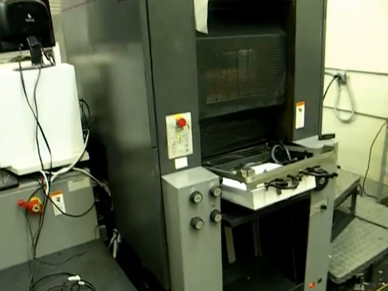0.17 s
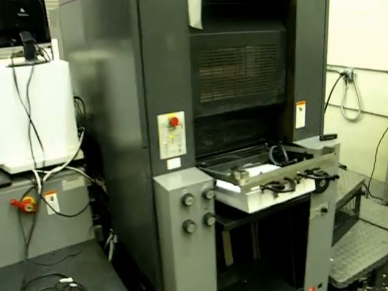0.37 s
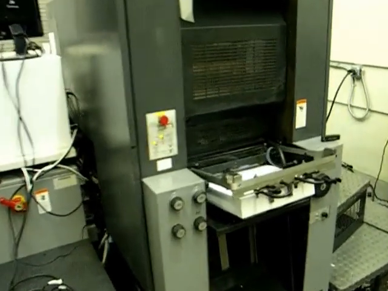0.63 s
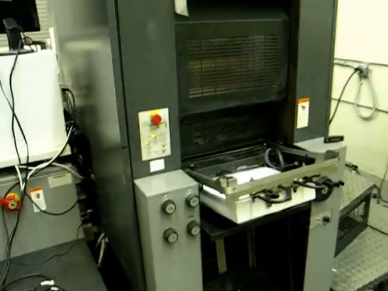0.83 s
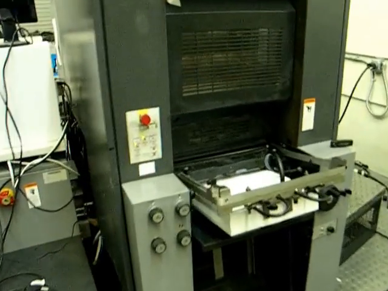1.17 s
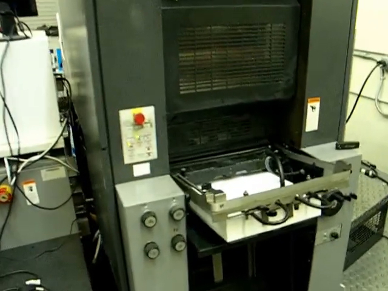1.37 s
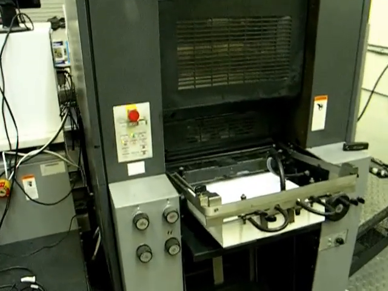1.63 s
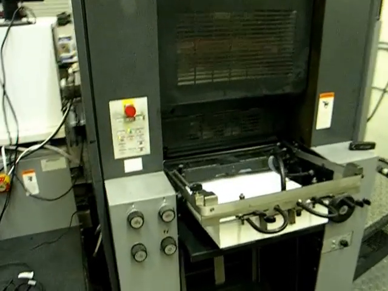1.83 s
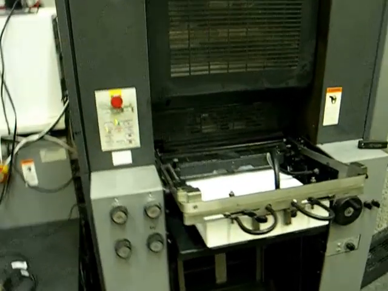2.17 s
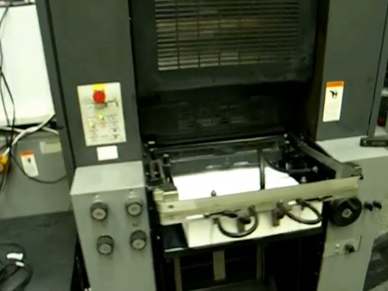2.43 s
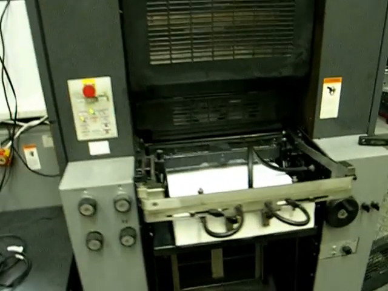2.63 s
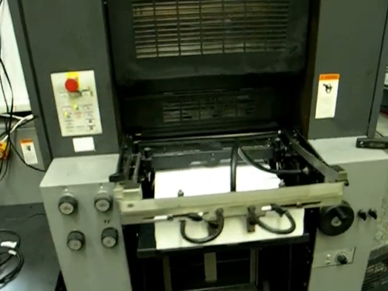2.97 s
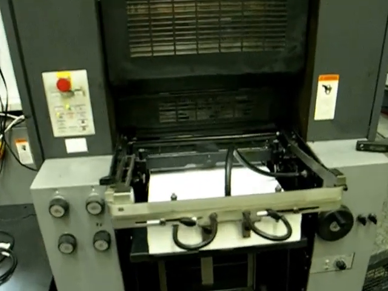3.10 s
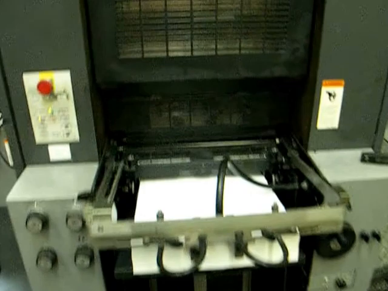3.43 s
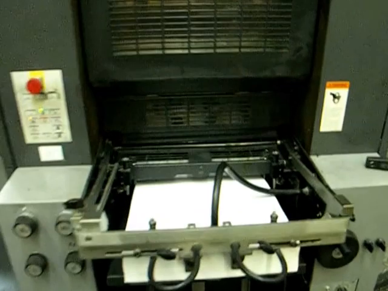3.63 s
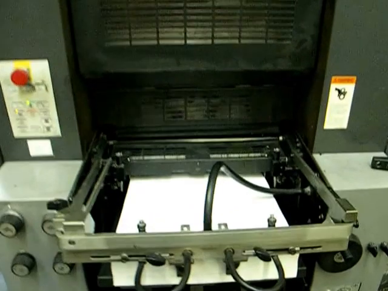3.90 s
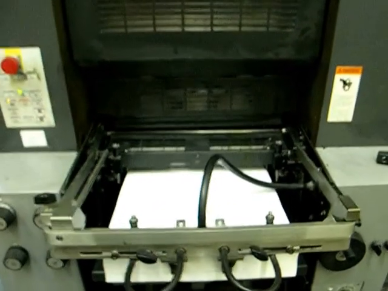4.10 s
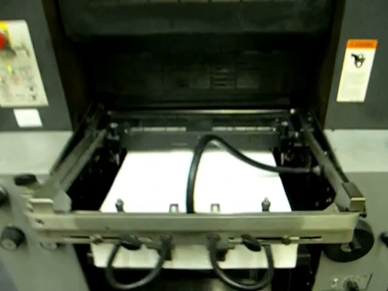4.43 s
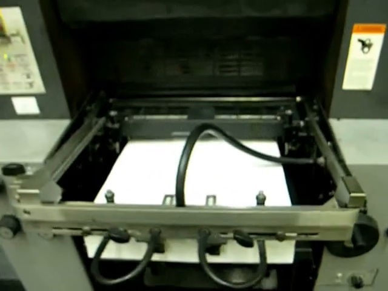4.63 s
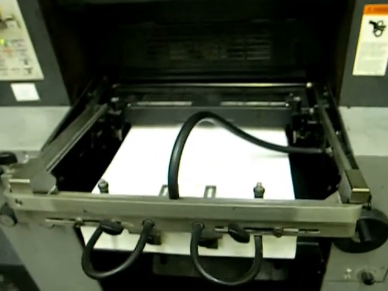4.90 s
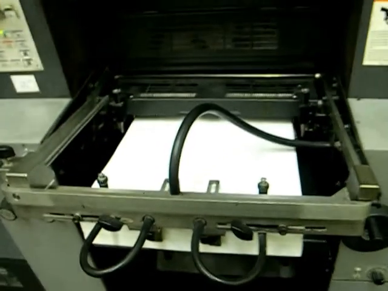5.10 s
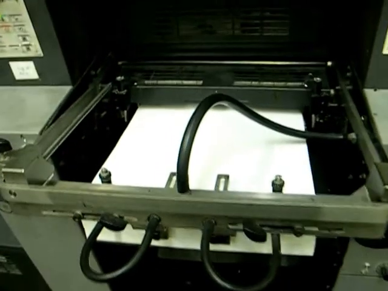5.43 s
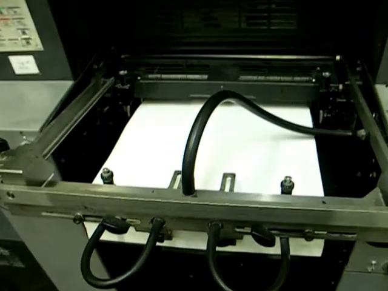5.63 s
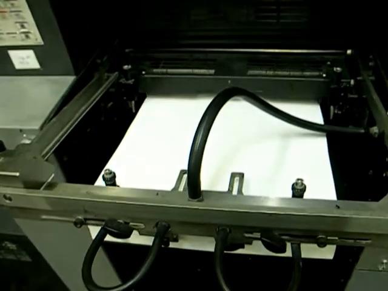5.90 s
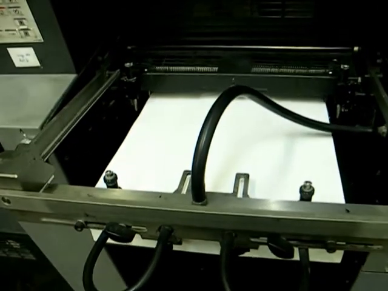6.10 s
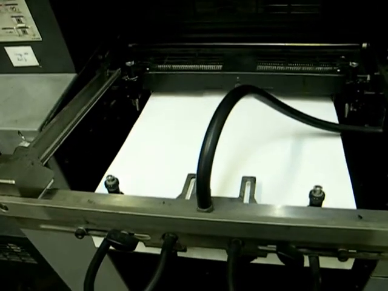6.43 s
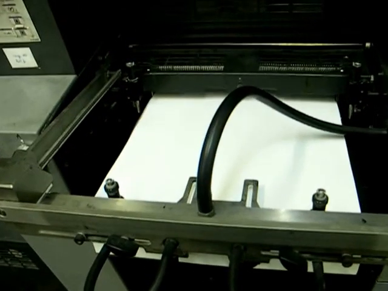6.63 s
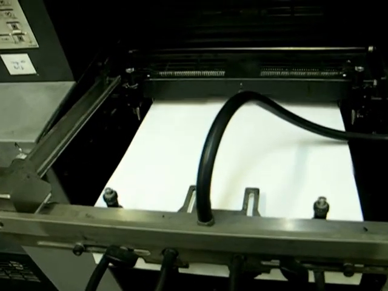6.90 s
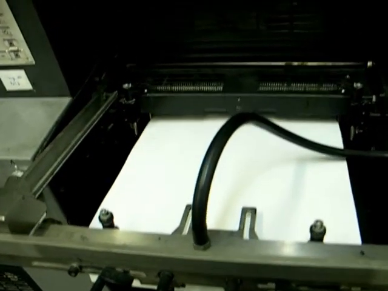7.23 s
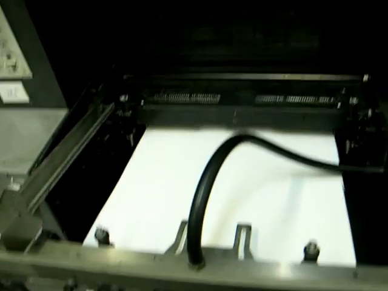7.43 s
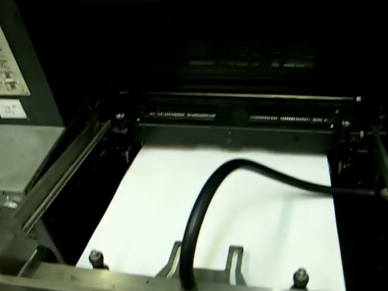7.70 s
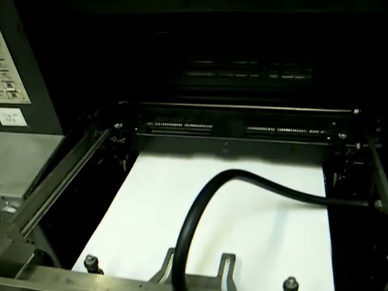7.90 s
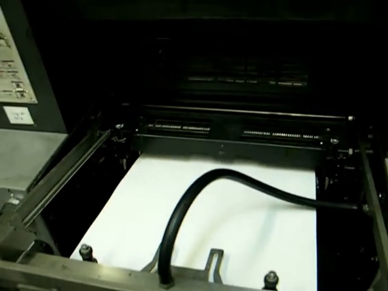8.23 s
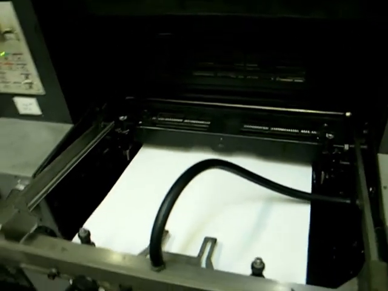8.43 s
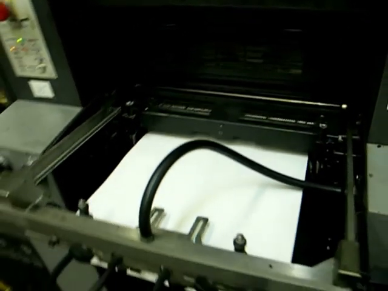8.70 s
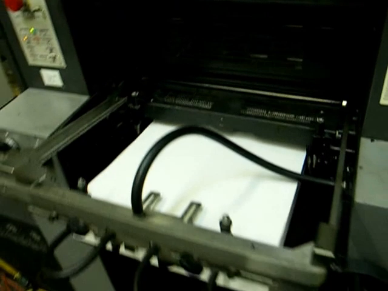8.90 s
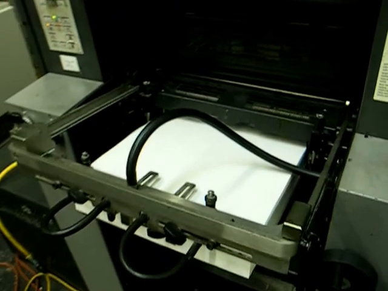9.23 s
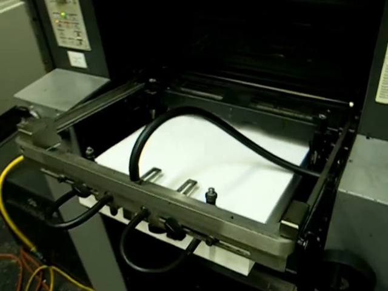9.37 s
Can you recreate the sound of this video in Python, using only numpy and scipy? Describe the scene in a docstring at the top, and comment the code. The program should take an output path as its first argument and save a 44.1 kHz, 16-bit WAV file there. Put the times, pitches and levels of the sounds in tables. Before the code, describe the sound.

Rhythmic clatter of a sheetfed printing press, two hollow clacks a second, with gear rumble, suction hiss and a droning pump and blower.

```python
"""A small sheetfed offset press runs at about two sheets a second, heard on a walk up to its feeder.
In every turn gears rumble, suction air and paper rush, cams knock, panels boom and the feeder shuts
with a hard clack; now and then a sheet slaps a guide. Motor, pump and blower hum underneath, with a few
dull bumps. The narrow-band microphone ducks its gain after each clack and clips the peaks."""
import sys
import numpy as np
from scipy import signal
from scipy.fft import rfft, irfft, next_fast_len
from scipy.io import wavfile
from scipy.ndimage import uniform_filter1d, map_coordinates

SR = 44100
rng = np.random.default_rng(int(sys.argv[2]) if len(sys.argv) > 2 else 0)


def dump(signal):
    """Clip the signal to [-1, 1] and save it as 16-bit WAV at the path in sys.argv[1]."""
    limited = np.clip(np.atleast_2d(signal).T, -1, 1)
    pcm = np.round(limited * 32767).astype(np.int16)
    wavfile.write(sys.argv[1], SR, pcm)


N = 421155
TIME = np.arange(N) / SR

# The colour of rattles and paper cracks. Each row: frequency in Hz, level in dB.
RATTLE_SPECTRUM = [(40, -24), (130, -18.5), (250, -12.5), (700, -3.5), (1500, 5.5), (2100, 6.5),
                   (3000, 2.5), (4000, -4.5)]


def feeder_clacks(level_db=7, ring_hz=796, scatter_db=1.0, detune=.03, lead_s=.0012):
    """The feeder bar hits its stop at the end of each turn: a loud, hollow, heavily damped ring."""
    out = np.zeros(N)
    t = np.arange(SR // 10) / SR
    envelope = fade(t, t60=0.02, attack_s=.0015)
    for end in turn_ends():
        force, pitch = rng.standard_normal(2)
        ring = np.sin(2 * np.pi * ring_hz * (1 + detune * pitch) * t)
        add(out, end - lead_s, amp(level_db + scatter_db * force) * envelope * ring)
    return out


def knocks(scatter_db=0.68, detune=.025, jitter_s=0.00056):
    """Cams, suckers and stops strike in every turn: a short ring and a rattle, never twice quite alike."""
    # Each row: time from the clack in seconds, ring pitch in Hz, ring level in dB, rattle level in dB.
    contacts = [(-.273, 596, -15.5, -27.5), (-.2055, 719, -18.5, -11.5), (-.177, 2456, -19.5, -14.5),
                (-.166, 678, -12, -24), (-.160, 1382, -19.5, -16), (-.1195, 1350, -14.5, -15),
                (-.0885, 1200, -10.5, -18), (-.0815, 2825, -13, -15.5), (-.0805, 1354, -16, -24.5),
                (-.0795, 551, -12.5, -30.5), (-.0016, 1650, -9, -11.5), (.0046, 1460, -4.5, -12.5),
                (.0055, 648, -8.5, -18.5), (.032, 2880, -24, -20.5), (.037, 566, -14.5, -23)]
    rings, rattle_power = np.zeros(N), np.zeros(N)
    t = np.arange(SR // 10) / SR
    rattle_fade = fade(t, t60=0.04)
    for s, hz, ring_db, rattle_db in contacts:
        ring_fade = amp(ring_db) * fade(t, t60=.03 * (1000 / hz) ** 0.57)  # higher rings die sooner
        for end in turn_ends():
            size, pitch, late = rng.standard_normal(3)
            start, force = end + s + jitter_s * late, amp(scatter_db * size)
            add(rings, start, force * ring_fade * np.sin(2 * np.pi * hz * (1 + detune * pitch) * t))
            add(rattle_power, start, (force * amp(rattle_db) * rattle_fade) ** 2)
    return rings + np.sqrt(rattle_power) * turning_noise(RATTLE_SPECTRUM, share=0.25)


def gears(idle_db=-28.5, load_boost_db=10.5, pull_boost_db=3.5):
    """The gears rumble louder as they take up the load, and surge as the sheet is pulled in."""
    # Each row: frequency in Hz, level in dB.
    rumble_spectrum = [(30, -41.5), (80, -42.5), (120, -16.5), (150, -12), (200, -3.5), (280, -2.5),
                       (430, 2), (520, -5.5), (640, -1), (1000, -4), (1600, -9), (4000, -20)]
    t = since_clack()
    load = stroke(t, start_s=.125, attack_s=0.097, release_s=0.072)
    pull = swell(t - 0.3775, width_s=0.032)
    level_db = idle_db + load_boost_db * load + pull_boost_db * pull
    return amp(level_db) * turning_noise(rumble_spectrum, share=0.37)


def suction_air(shut_db=-34.5, open_boost_db=16, lift_boost_db=7.5):
    """Air and crinkling paper rush while the suction is open, with a hiss as the suckers lift a sheet."""
    # Each row: frequency in Hz, level in dB.
    rush_spectrum = [(150, -47), (500, -3.5), (900, -9), (1300, -17.5), (1700, -6), (2400, 4.5),
                     (3000, 2.5), (4000, 0.5)]
    t = since_clack()
    suction = stroke(t, start_s=0.089, attack_s=.125, release_s=0.011)
    lift = swell(t - 0.247, width_s=0.012)
    level_db = shut_db + open_boost_db * suction + lift_boost_db * lift
    crinkle = amp(1.3 * wobble(400) + .4 * wobble(40))
    return amp(level_db) * unit(crinkle * turning_noise(rush_spectrum, share=0.65))


def panel_booms(scatter_db=0.5, detune=0.013):
    """The side panels resonate as the load passes, swelling and sinking at set points of the turn."""
    # Each row: time from the clack in seconds, pitch in Hz, swell width in seconds, level in dB.
    booms = [(-.305, 405.5, 0.026, -22.5), (-.24, 221.4, 0.016, -21), (-.218, 410.4, 0.025, -22.5),
             (-.158, 394, 0.0098, -28), (-.13, 203, .028, -22), (-.055, 400, 0.036, -23.5),
             (-.035, 198.6, 0.028, -21)]
    out = np.zeros(N)
    t = np.arange(-SR // 10, SR // 10) / SR
    for end in turn_ends():
        for s, hz, width_s, db in booms:
            force, pitch, phase = rng.standard_normal(3)
            envelope = amp(db + scatter_db * force) * swell(t, width_s)
            tone = np.sin(2 * np.pi * (hz * (1 + detune * pitch) * t + phase))
            add(out, end + s + t[0], envelope * tone)
    return out


def sheet_slaps(ring_db=-5, crack_db=-13):
    """Now and then a sheet's edge hits a guide harder: a short ring and a papery crack."""
    # Each row: start in seconds, level in dB, ring pitch in Hz.
    slaps = [(2.9482, -6.5, 641), (3.0464, 0, 528), (5.005, -2.5, 1350), (5.5656, -4, 1330),
             (6.6191, -3, 1280), (7.1344, -3.5, 582), (8.549, -5, 678)]
    rings, crack_envelope = np.zeros(N), np.zeros(N)
    t = np.arange(SR // 10) / SR
    for s, db, hz in slaps:
        blow = amp(db) * fade(t, t60=.025)
        add(rings, s, blow * np.sin(2 * np.pi * hz * t))
        add(crack_envelope, s, blow)
    return amp(ring_db) * rings + amp(crack_db) * crack_envelope * noise(RATTLE_SPECTRUM)


def motor_hum():
    """Mains and motor hum, with one high overtone from the blower."""
    # Each row: pitch in Hz, level in dB.
    tones = [(120, -55), (163, -50.5), (199.3, -37), (398.8, -34), (2664, -50)]
    return sum(shaken_tone(hz, db) for hz, db in tones)


def vacuum_pump(pitch_hz=233.3):
    """The pump drones, coming through more as the microphone leans over the sheets."""
    # The level of each harmonic in dB, from the fundamental up.
    harmonics_db = [-38.5, -36, -38.5]
    # Each row: time in seconds, gain in dB.
    gain_ride = [(0, -2), (5, -3.5), (5.8, 3.5), (9.55, 1)]
    drone = sum(shaken_tone(k * pitch_hz, db) for k, db in enumerate(harmonics_db, 1))
    return amp(along_walk(gain_ride)) * drone


def blower(rush_db, whine_hz=1333):
    """The blower rushes steadily while the whine of its blades comes and goes along the walk."""
    # Each row: time in seconds, level in dB.
    whine_ride = [(0, -36), (1.15, -30.5), (2.9, -44), (4.5, -31.5), (6.1, -35), (6.7, -40.5), (8.3, -43),
                  (9.1, -30)]
    # Each row: frequency in Hz, level in dB.
    rush_spectrum = [(30, -35.5), (85, -30), (120, -11), (145, -21.5), (180, -15), (270, -3.5), (370, -0.5),
                     (620, -1), (1000, -4), (1600, -5), (2100, -6), (3000, -9.5)]
    whine_db = along_walk(whine_ride) + 2.1 * wobble(9.4)
    whine = np.sqrt(2) * np.sin(2 * np.pi * whine_hz * TIME + wobble(5))
    return amp(whine_db) * whine + amp(rush_db) * noise(rush_spectrum)


def dull_bumps():
    """A few low bumps, each one soft push without a ring."""
    # Each row: time in seconds, level in dB.
    pushes = [(0.091, -21), (2.496, -16.5), (5.888, -13.5), (6.493, -21), (6.894, -22), (9.087, -13.5)]
    return sum(amp(db) * swell(TIME - s, width_s=0.00042) for s, db in pushes)


def shop_walls(x, wet_db=-14):
    """The walls of the small shop answer every blow with a short tail."""
    t = np.arange(SR // 2) / SR
    tail = rng.standard_normal(len(t)) * fade(t, t60=0.19, attack_s=0.0027)
    return x + amp(wet_db) * signal.fftconvolve(x, tail / np.linalg.norm(tail))[:N]


def turn_ends(first_s=.0531, turn_s=.512305, quicken_s=.0000607):
    """When each turn ends, in seconds; the press gathers speed very slightly."""
    turn = np.arange(-1, 20)
    return first_s + turn * turn_s - quicken_s * turn * (turn - 1) / 2


def since_clack():
    """Seconds since the last turn ended."""
    ends = turn_ends()
    return TIME - ends[np.searchsorted(ends, TIME, side="right") - 1]


def turning_noise(spectrum, share):
    """Noise with a share of its power coming back in each turn, because the same parts meet again."""
    repeating = noise(spectrum)[(since_clack() * SR).astype(int) + SR]
    return np.sqrt(share) * repeating + np.sqrt(1 - share) * noise(spectrum)


def shaken_tone(hz, db, waver_db=2.5, shake_db=1.5, drift_rad=0.4):
    """One tone of the hum, its level and phase shaken by the running press."""
    level = amp(db + waver_db * wobble(3) + shake_db * wobble(26))
    return np.sqrt(2) * level * np.sin(2 * np.pi * hz * TIME + drift_rad * wobble(13))


def stroke(t, start_s, attack_s, release_s):
    """0 to 1 through a turn: rises, holds until the clack and lets go after it."""
    return np.clip(np.maximum((t - start_s) / attack_s, 1 - t / release_s), 0, 1)


def fade(t, t60, attack_s=0.00045):
    """The envelope of a blow: a fast rise, then 60 dB of decay in t60 seconds."""
    return amp(-60 * t / t60) * (1 - np.exp(-t / attack_s))


def swell(t, width_s):
    """A bell-shaped hump of height 1 around time 0."""
    return np.exp(-(t / width_s) ** 2 / 2)


def wobble(rate):
    """A smooth random curve, rate knots a second."""
    return map_coordinates(rng.standard_normal(int(N * rate / SR) + 4), [TIME * rate])


def along_walk(points):
    """A curve in straight lines through (seconds, value) points."""
    return np.interp(TIME, *np.transpose(points))


def coloured(x, spectrum):
    """Equalise x by (Hz, dB) points on a log frequency axis."""
    size = next_fast_len(len(x) + 8192)
    hz, db = np.transpose(spectrum)
    bins_hz = np.fft.rfftfreq(size, 1 / SR)
    gain = amp(np.interp(np.log(bins_hz + 1), np.log(hz), db))
    return irfft(rfft(x, size) * gain, size)[:len(x)]


def noise(spectrum):
    """Coloured noise of rms 1."""
    return unit(coloured(rng.standard_normal(N), spectrum))


def add(track, s, sound):
    """Mix a sound into the track from second s."""
    start = int(round(s * SR))
    lo, hi = max(start, 0), min(start + len(sound), N)
    if hi > lo:
        track[lo:hi] += sound[lo - start:hi - start]


def amp(db):
    """Decibels as a gain."""
    return 10 ** (np.asarray(db) / 20)


def unit(x):
    """x scaled to rms 1."""
    return x / np.sqrt(np.mean(x ** 2) + 1e-20)


def scene():
    """The press in mono: towards the feeder the knocks grow and the blower's rush falls behind."""
    # Each row: time in seconds, nearness from 0 (beside the press) to 1 (in front of the feeder).
    walk = [(0, 0), (1.3, 0.59), (2.7, 0.96), (5.3, 0.93), (8.3, 0.99), (9.55, 0.44)]
    near = along_walk(walk)
    drone = motor_hum() + vacuum_pump() + blower(rush_db=-14 - 9 * near)
    running = amp(-0.25) * (gears() + suction_air() + panel_booms())
    blows = amp(-2.5 + 7 * near) * knocks() + sheet_slaps() + feeder_clacks()
    return (shop_walls(blows) + running + drone + dull_bumps())[None]


def gain_control(x, threshold_db=-3.5, release_db_per_s=120):
    """Loud peaks pull the gain down within a few milliseconds; it soon comes back."""
    over_db = np.maximum(20 * np.log10(np.abs(x) + 1e-9) - threshold_db, 0)
    release_ramp = release_db_per_s * TIME
    duck_db = np.maximum.accumulate(over_db + release_ramp) - release_ramp
    return x * amp(-uniform_filter1d(duck_db, size=150))


def record(dry, offset=-.042, ceiling=.715, hardness=24, top_hz=15850):
    """A narrow-band microphone, gain control, a converter that sits off zero and clips, and a top cut."""
    # Each row: frequency in Hz, gain in dB.
    mic_response = [(2850, -0.5), (3400, -5), (3800, -9.5), (4100, -19.5), (4400, -37), (4750, -82.5)]
    ducked = gain_control(coloured(dry[0], mic_response)) + offset
    clipped = ducked / (1 + np.abs(ducked / ceiling) ** hardness) ** (1 / hardness)
    passband = np.fft.rfftfreq(N, 1 / SR) < top_hz
    return irfft(rfft(clipped) * passband, N)[None]


dry = scene()
out = record(dry)
dump(out)
```